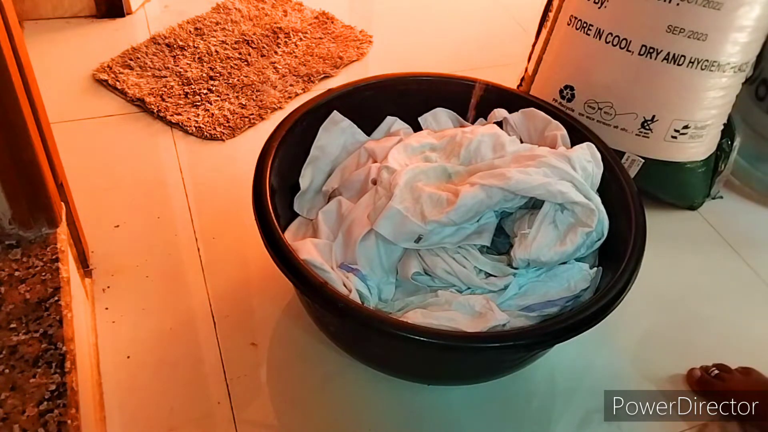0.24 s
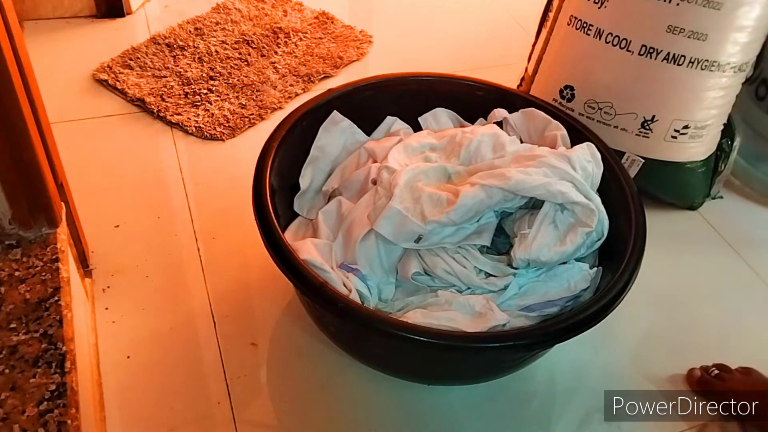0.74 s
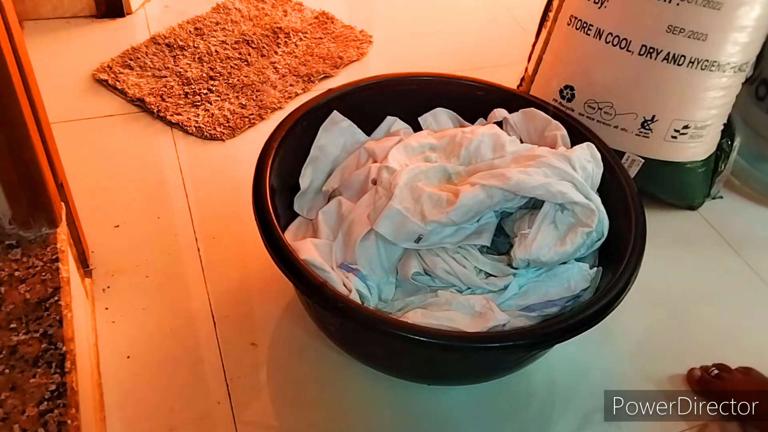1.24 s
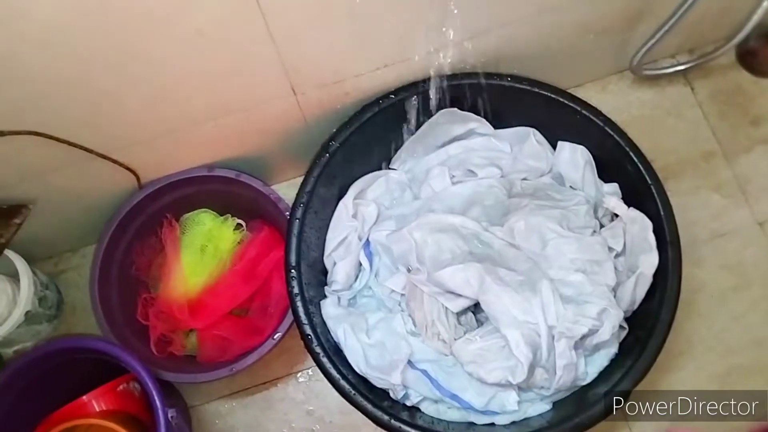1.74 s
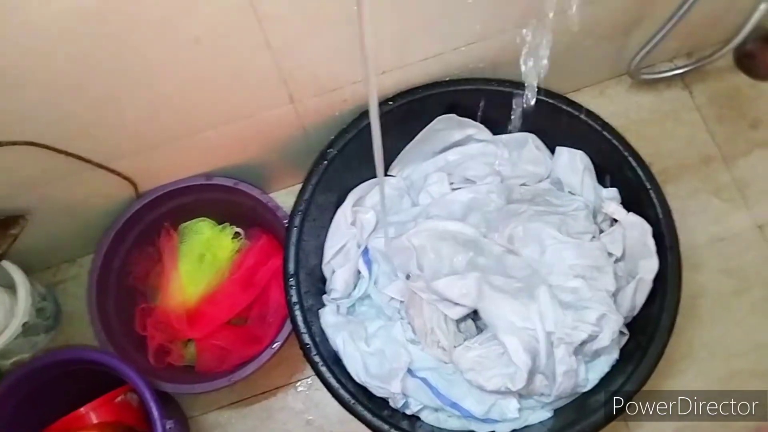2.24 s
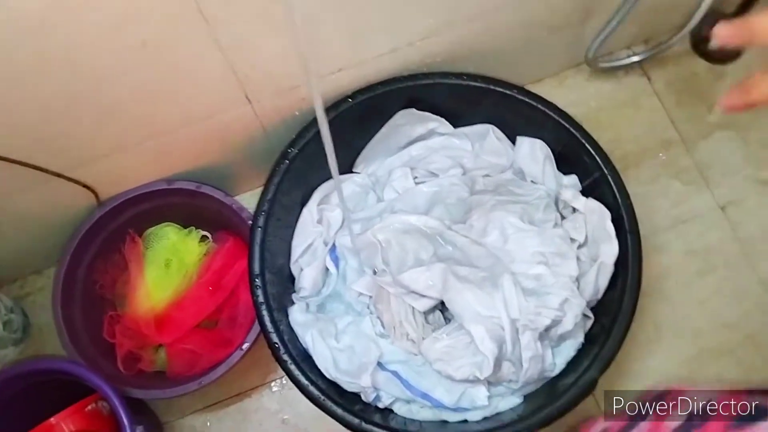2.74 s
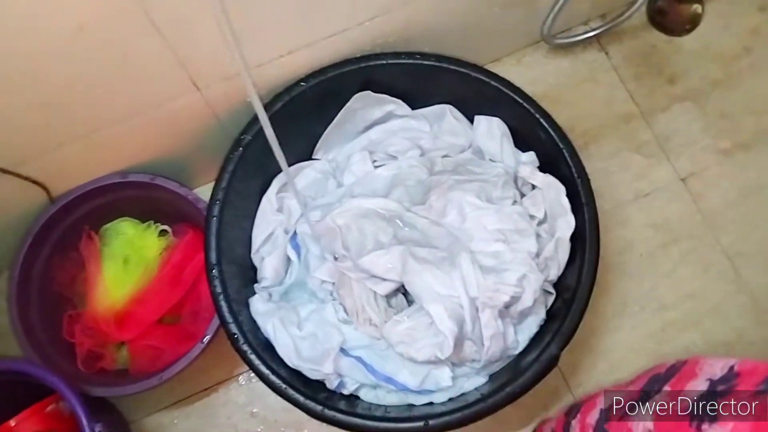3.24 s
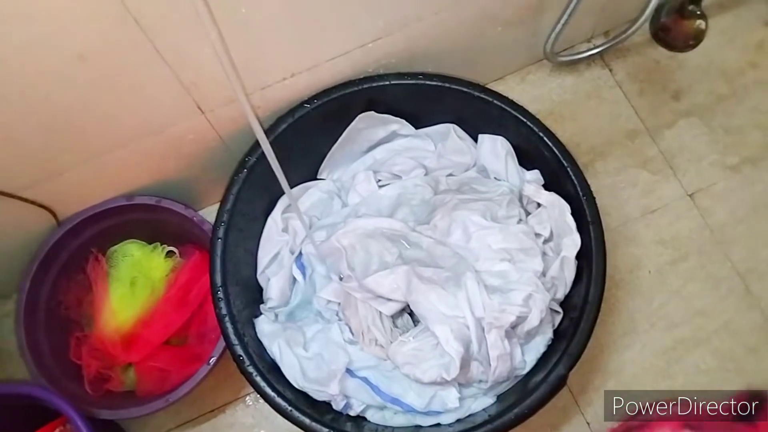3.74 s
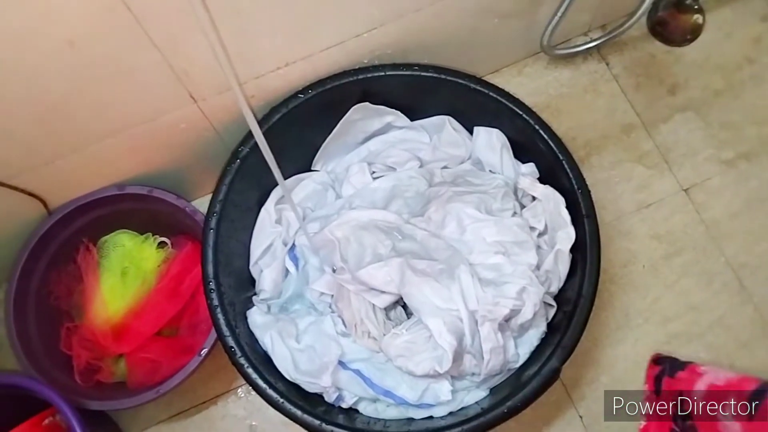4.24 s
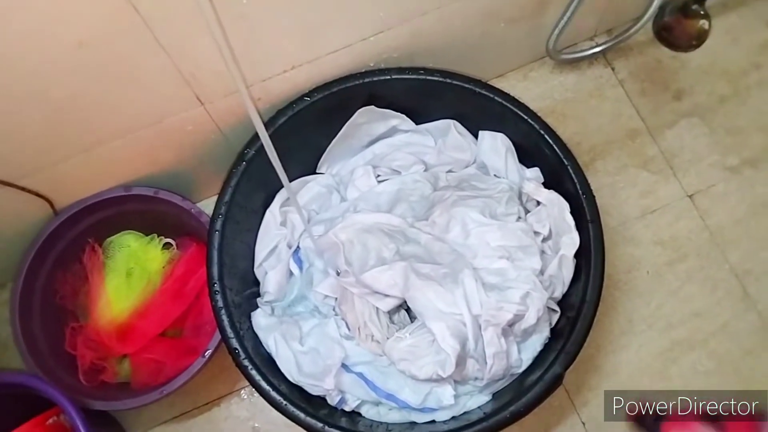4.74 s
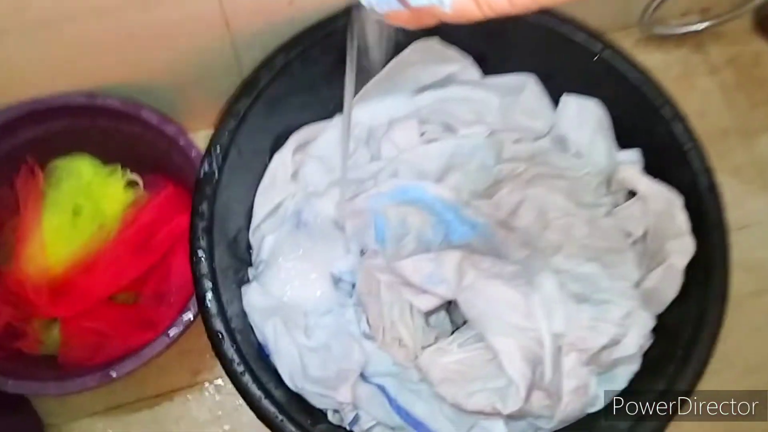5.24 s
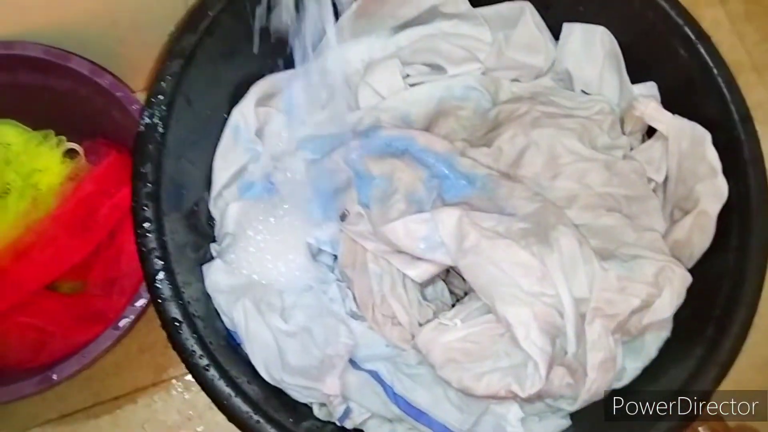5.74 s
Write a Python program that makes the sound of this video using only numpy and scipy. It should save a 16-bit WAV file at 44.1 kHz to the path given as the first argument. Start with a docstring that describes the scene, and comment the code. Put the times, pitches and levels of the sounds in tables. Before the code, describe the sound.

Faint room rumble and isolated drips come first, with one tiny squeak. Then water gushes suddenly into a tub of soaked laundry: crisp droplets, soft slaps, low wall drumming, bubbles and froth. It runs irregularly until just after five seconds, then drops to thinner, patchy spatter over a motor-like hum. Indoors on hard tile, heard closely by a small stereo microphone, brighter on the right.

```python
"""A quiet tiled washroom: low rumble, faint hiss, a far motor's hum, a few ringing drips, a faint squeak.
Then a tap jet falls into a plastic tub of wet clothes: noise snaps make the spatter and wet slaps,
short rising tones make bubbles and gurgles, and ringing filters make the tub wall drum.
Froth surges briefly, and big droplets ring the right one of two small microphone ports near 9 kHz."""
import sys
import numpy as np
from scipy import signal
from scipy.io import wavfile
from scipy.ndimage import uniform_filter1d

SR = 44100
rng = np.random.default_rng(int(sys.argv[2]) if len(sys.argv) > 2 else 0)


def store_pcm(level_fs):
    """Save levels as 16-bit WAV."""
    pcm = np.round(np.clip(level_fs, -1, 1) * 32767).astype(np.int16)
    wavfile.write(sys.argv[1], SR, np.atleast_2d(pcm).T)


N = 264159


def gain_of(db):
    """Turns decibels into amplitude."""
    return 10 ** (np.asarray(db) / 20)


def evened(x):
    """Scales so that the mean of the channels has rms 1."""
    return x / np.sqrt(np.mean(np.atleast_2d(x).mean(0) ** 2) + 1e-20)


def read(points, hz):
    """Reads a spectrum table at the given frequencies."""
    f, value = np.transpose(points)
    return np.interp(np.log(hz + 1), np.log(f + 1), value)


def follow(table, before=-120.):
    """Reads the columns of a time table, sample by sample."""
    s, *columns = np.transpose(table)
    return [np.interp(np.arange(N) / SR, s, c, left=before) for c in columns]


def colour(x, points):
    """Filters with the gains of a spectrum table; nothing sounds before its cause."""
    hz = abs(np.fft.fftfreq(4096, 1 / SR))
    log_gain = np.log(gain_of(read(points, hz)))
    # the phase that goes with these gains in a causal filter
    response = np.exp(np.conj(signal.hilbert(log_gain)))
    taps = np.fft.ifft(response).real[:2048]
    taps = taps.reshape((1,) * (x.ndim - 1) + (-1,))
    return signal.oaconvolve(x, taps, axes=-1)[..., :N]


def closed(points):
    """Adds steep ends to a spectrum table."""
    (low_hz, low_db), (high_hz, high_db) = points[0], points[-1]
    return [(low_hz / 3, low_db - 40)] + points + [(high_hz * 3, high_db - 40)]


# Treble lift of the right port's cavity: f/Hz, level/dB
RIGHT_PORT = [(3500, -1), (5500, 6), (7000, 11.5), (8000, 14.5), (8850, 21), (9500, 17), (10500, 9),
              (12000, 4.5), (15500, 1.5)]


def ports(x):
    """The small cavity of the right microphone port lifts the treble."""
    return np.array([x[0], colour(x[1], RIGHT_PORT)])


def spatter(x, points):
    """Gives water hits their colour, as the two ports hear them."""
    return ports(colour(x, points))


def drift(samples):
    """Makes slow random movement of rms 1."""
    smoothed = uniform_filter1d(rng.standard_normal(N), size=samples)
    return evened(uniform_filter1d(smoothed, size=samples))


# How alike the two sides are: f/Hz, likeness
LIKENESS = [(60, 0.56), (130, 1), (290, 0.89), (640, 0.32), (1410, -0.19), (3100, 0.12), (6820, -1.05),
            (15000, 0.41)]
# How much louder the left side is: f/Hz, level/dB
LEFT_LEAN = [(60, 11.5), (150, 5), (400, 0.5), (800, 1), (2000, -1), (4000, -2.5)]


def wash(points, patchy_db):
    """Makes two-channel noise whose likeness depends on pitch, with drifting loud and soft patches."""
    frames, hz = N // 256 + 5, np.fft.rfftfreq(1024, 1 / SR)
    a, b, c, d, patches = rng.standard_normal((frames, 513, 5)).T
    patches = uniform_filter1d(uniform_filter1d(patches, size=10, axis=0), size=12, axis=1)
    same = np.clip(read(LIKENESS, hz), -1, 1)[:, None]
    left = a + 1j * b
    right = same * left + np.sqrt(1 - same ** 2) * (c + 1j * d)
    z = np.array([left * gain_of(read(LEFT_LEAN, hz))[:, None], right])
    z *= gain_of(read(closed(points), hz)[:, None] + patchy_db * patches / patches.std())
    return signal.istft(z, nperseg=1024, noverlap=768)[1][:, :N]


def sparse(per_s, spread_db, shape):
    """Picks random instants of scattered size: spread above 0, a few stand out; below 0, a few are weaker."""
    sizes = gain_of(spread_db * np.minimum(rng.exponential(1, shape), 5))
    return sizes * (rng.random(shape) < per_s / SR)


def burst(train, decay_s):
    """Each instant starts a dying envelope."""
    return signal.lfilter([1], [1, -np.exp(-1 / (decay_s * SR))], train)


def crackle(per_s, spread_db, snap_s, bed):
    """Noise breaks up into quick snaps over a steady bed."""
    snaps = evened(burst(sparse(per_s, spread_db, N), snap_s))
    return np.hypot(bed, snaps) * rng.standard_normal((2, N))


def tone(hz, db, waver, wobble):
    """A steady tone wavers in strength and wobbles in phase (wobble in turns)."""
    turns = hz * np.arange(N) / SR + rng.random() + wobble * drift(samples=2500)
    strength = gain_of(db) * (1 + waver * drift(samples=2000))
    return np.sqrt(2) * strength * np.sin(2 * np.pi * turns)


def bubble(hz, cycles, rise):
    """A small air bubble starts softly, rings briefly and, if rise is above 0, climbs in pitch."""
    u = np.arange(round(4 * cycles / hz * SR)) / SR * hz / cycles
    envelope = (1 - np.exp(-9 * u)) ** 2 * np.exp(-1.5 * u)
    return envelope * np.sin(2 * np.pi * cycles * u * (1 + rise * u))


def place_rings(table, rise):
    """Places short rings at listed moments; the right port hears each one 9 samples later."""
    out = np.zeros((2, N + SR))
    for s, level_db, hz, cycles in table:
        ring = gain_of(level_db) * bubble(hz, cycles, rise)
        at = round(s * SR)
        out[0, at:at + len(ring)] += ring
        out[1, at + 9:at + 9 + len(ring)] += ring
    return out[:, :N]


# Room air: t/s, rumble level/dB, hiss level/dB
AIR = [(0, -43.5, -49.5), (0.35, -43, -51), (0.43, -40.5, -47), (0.6, -43.5, -51), (1.44, -45.5, -52),
       (2., -44, -49), (3.5, -44.5, -49.5), (5.15, -44.5, -58), (5.25, -65, -45), (5.99, -40.5, -51.5)]
# Deepest rumble: t/s, level/dB
DEEP = [(0, -65), (1.5, -67), (3, -64), (3.8, -61), (4.6, -68), (5.2, -70), (5.99, -57)]
# Tone colour of rumble, hiss and deepest rumble: f/Hz, relative level/dB per Hz
RUMBLE_COLOUR = [(12, -50), (20, -21), (71, -47), (113, -13), (229, 4), (260, 3), (285, 1), (439, -0.5),
                 (472, 0.5), (597, 3), (642, -1), (938, -2.5), (1150, -7), (1350, -18), (1500, -36),
                 (1950, -83), (3300, -120)]
HISS_COLOUR = [(900, -3.5), (1300, -7), (2000, -12), (3200, -13.5), (4500, -20.5), (8000, -29),
               (12000, -30.5), (15500, -26)]
DEEP_COLOUR = [(20, -6), (45, -7), (70, 4), (100, 2), (130, -25.)]


def air():
    """The room's air is coloured noise: low rumble, faint hiss and a deeper rumble below."""
    rumble_db, hiss_db = follow(AIR)
    rumble = evened(wash(RUMBLE_COLOUR, patchy_db=.5))
    hiss = evened(ports(wash(HISS_COLOUR, patchy_db=.5)))
    deep = evened(wash(DEEP_COLOUR, patchy_db=.5))
    return gain_of(rumble_db) * rumble + gain_of(hiss_db) * hiss + gain_of(follow(DEEP)[0]) * deep


HUM_HZ = 261.8  # the motor's second order
# Far motor: t/s, second order level/dB, other orders level/dB
HUM = [(0, -67, -71), (1.43, -56.5, -59), (1.47, -47, -53), (2.6, -46, -51), (3.1, -51.5, -52.5),
       (3.9, -49.5, -50.5), (4.5, -52.5, -53.5), (4.7, -47.5, -61), (4.95, -52, -58), (5.17, -49, -58),
       (5.21, -41, -65), (5.5, -39, -63), (5.62, -46, -68), (5.99, -44, -62)]
# The other orders: multiple of the second order's pitch, level/dB added to their shared level
HUM_ORDERS = [(.5, -5.), (1.5, -7.), (2, -2.), (4, -13.)]
# How freely the second order wavers: t/s, strength depth 0-1, phase wobble/turns
LOOSE = [(0, .45, .14), (5.15, .45, .14), (5.21, .08, .04), (5.99, .08, .04)]


def hum():
    """A far motor hums at several multiples of one pitch, each wavering alone."""
    second_db, others_db = follow(HUM)
    waver, wobble = follow(LOOSE, before=0)
    others = sum(tone(k * HUM_HZ, db + others_db, .5, .16) for k, db in HUM_ORDERS)
    return tone(HUM_HZ, second_db, waver, wobble) + others


DRONE_HZ = 114.5
# Lower drone: t/s, level/dB
DRONE = [(0, -57.5), (1.43, -57), (1.47, -64), (3.7, -66), (5.15, -71), (5.25, -60.5), (5.99, -52.5)]


def drone():
    """A single wavering tone drones below the motor's hum."""
    return tone(DRONE_HZ, follow(DRONE)[0], waver=0.5, wobble=0.18)


DRIP_LEAN_DB = -3  # left side against right
TOP_HZ = 10500  # where the top treble begins
# Single drips: t/s, hit level/dB, tail level under the hit/dB, top treble level/dB
DRIPS = [(.006, -40.5, -4, 0.1), (0.0334, -26, -24, 7), (.046, -39, -20, 3), (.125, -38, -18, -3),
         (.1685, -39, -26, -3), (0.3503, -25.5, -21.5, -5), (0.38, -42, -22, -1), (1.078, -39, -16, -4),
         (1.172, -39.5, -12, -10)]
# Tone colour of a drip: f/Hz, relative level/dB per Hz
DRIP_COLOUR = [(300, -50.), (3000, -13), (6000, -17.5), (9000, -15), (12000, -7), (15500, -5.5)]


def drips(tail_s=0.04):
    """A lone drip makes one sharp snap, then the tiles ring on as fading noise."""
    s, hit_db, tail_db, top_db = np.transpose(DRIPS)
    hits, tails, one = np.zeros((3, 2, N))
    at = np.round(s * SR).astype(int)
    hits[:, at] = gain_of(hit_db) * gain_of([[DRIP_LEAN_DB], [0]])
    tails[:, at] = hits[:, at] * gain_of(tail_db)
    # scale by the response to a single click
    one[:, 0] = 1
    unit = abs(spatter(one, DRIP_COLOUR)[1]).max() / 2
    snaps = burst(hits, 0.00015) + burst(tails, tail_s)
    out = spatter(hits + snaps * rng.standard_normal((2, N)), DRIP_COLOUR) / unit
    high_pass = signal.firwin(101, TOP_HZ, pass_zero=False, fs=SR)
    top = signal.oaconvolve(out, high_pass[None], "same")
    # each drip's treble setting holds until just before the next drip
    latest = np.maximum(np.searchsorted(at - 100, np.arange(N)) - 1, 0)
    return out + (gain_of(top_db)[latest] - 1) * top


SQUEAK_S, SQUEAK_LENGTH_S = 0.385, 0.065  # full for half this length, then fades over one length
# Tones in the squeak: f/Hz, level/dB
SQUEAK_PARTIALS = [(960, -56), (1190, -57), (1385, -59), (1770, -61), (2070, -67), (2295, -59), (3220, -69)]


def squeak():
    """A faint cluster of wavering tones starts quickly and fades."""
    age = np.arange(N) / SR - SQUEAK_S
    shape = np.clip(age / 0.0043, 0, 1) * np.clip(1.5 - age / SQUEAK_LENGTH_S, 0, 1)
    return shape * sum(tone(hz, db, waver=.3, wobble=.7) for hz, db in SQUEAK_PARTIALS)


TICK_CYCLES = 3
# Droplets on wet cloth: t/s, level/dB, f/Hz
TICKS = [(1.062, -44, 2500), (1.4795, -19, 1310), (1.4575, -20, 2780), (1.5267, -16, 5900),
         (1.56, -18, 5000), (1.5875, -19, 5600), (1.627, -19, 6000), (1.6883, -23, 3600),
         (1.7118, -13, 6310), (1.9722, -20, 6080), (2.056, -22, 4150), (2.059, -10, 6000),
         (2.1233, -25, 5280), (2.246, -17, 6470), (2.6122, -14, 6430), (3.143, -20, 4520),
         (3.8694, -20, 6030), (4.044, -15, 5970), (4.3987, -8, 6250), (4.7658, -9, 4460),
         (5.182, -13, 2020), (5.2267, -21, 1390), (5.303, -23, 1400), (5.415, -26, 1500),
         (5.4801, -25, 2930), (5.5146, -20, 6400), (5.55, -22, 2000), (5.5636, -16, 5600),
         (5.5959, -11, 6430), (5.6148, -28, 3000), (5.6683, -16, 5810), (5.7116, -29, 2690)]


def ticks():
    """Droplets tick on wet cloth: very short rings of fixed pitch."""
    return place_rings([(*row, TICK_CYCLES) for row in TICKS], rise=0)


# strong gushes lean to the right, weak flow to the left
USUAL_DB, LEAN_DB, LEAN_PER_DB = -23.5, 1.5, -0.54
RIGHTWARD_S, RIGHTWARD_LEAN_DB = 5.18, -4.5  # from this time the spatter sits further right
# Strength of the falling water: t/s, droplet spatter level/dB, bubble fizz level/dB
FLOW = [(1.4512, -42, -50), (1.454, -27, -45), (1.46, -21, -40), (1.482, -22.5, -39), (1.526, -25, -45),
        (1.579, -23, -41), (1.623, -23.5, -50), (1.651, -24, -51), (1.691, -28.5, -44.5),
        (1.705, -25.5, -38), (1.721, -23.5, -44), (1.749, -27.5, -43), (1.785, -26, -40.5),
        (1.819, -32, -50), (1.835, -29.5, -62), (1.905, -25, -56), (1.955, -28, -53), (1.99, -22.5, -48),
        (2.038, -29.5, -56), (2.064, -23, -40), (2.114, -32, -50), (2.134, -27, -49), (2.184, -30, -42),
        (2.21, -24, -39), (2.24, -23, -39), (2.258, -29, -41), (2.328, -26.5, -61), (2.352, -21, -49),
        (2.362, -27, -39), (2.416, -28, -39), (2.449, -26.5, -37), (2.463, -20, -39), (2.501, -21, -37),
        (2.587, -22.5, -37.5), (2.621, -20.5, -49), (2.675, -18.5, -42), (2.721, -22.5, -35),
        (2.803, -23.5, -37.5), (2.839, -19.5, -36), (2.924, -22, -39), (2.948, -22.5, -38),
        (3.002, -22.5, -36), (3.02, -22, -36), (3.046, -30, -40), (3.104, -28.5, -41), (3.128, -29, -38),
        (3.148, -22, -37.5), (3.208, -20.5, -33), (3.294, -23.5, -41), (3.321, -22, -38),
        (3.359, -22.5, -38.5), (3.393, -22, -36), (3.451, -21.5, -41.5), (3.473, -23.5, -39),
        (3.511, -24.5, -35), (3.553, -26, -34.5), (3.601, -23, -39), (3.677, -21, -33), (3.748, -21.5, -35),
        (3.79, -21, -36), (3.81, -22, -35.5), (3.888, -23, -37.5), (3.938, -21.5, -44.5),
        (3.998, -23, -33.5), (4.084, -26.5, -46), (4.154, -24, -37), (4.189, -26, -42), (4.235, -28, -39),
        (4.259, -23.5, -36), (4.293, -21.5, -31.5), (4.335, -26, -38), (4.387, -25.5, -39.5),
        (4.437, -25.5, -41.5), (4.459, -24, -46), (4.509, -25, -35.5), (4.585, -27.5, -36),
        (4.634, -29, -40.5), (4.678, -22.5, -38), (4.702, -25, -40), (4.714, -21.5, -33),
        (4.778, -22.5, -32), (4.818, -20, -30.5), (4.858, -21.5, -30), (4.902, -22, -34.5),
        (4.95, -23.5, -33.5), (5.006, -25.5, -34.5), (5.052, -27, -38.5), (5.107, -23, -34.5),
        (5.161, -20, -37), (5.177, -29, -40), (5.187, -32.5, -49), (5.207, -27, -51), (5.379, -29, -41),
        (5.417, -27, -47), (5.457, -29, -54), (5.487, -25, -42), (5.522, -27.5, -51), (5.576, -22.5, -60),
        (5.596, -26.5, -57), (5.656, -31.5, -42), (5.678, -28.5, -50), (5.74, -33, -56), (5.762, -30, -65),
        (5.828, -30, -56), (5.884, -25.5, -40), (5.987, -30.5, -52)]
# Extra coarse droplets in the spatter: t/s, level/dB
COARSE = [(1.45, 5.5), (1.9, 0), (2.1, 2), (2.3, 0), (2.5, 5), (3.3, 3.5), (3.85, 1), (4.1, 4.5), (5.15, 4),
          (5.3, 2), (5.55, 7), (5.575, 11), (5.605, 16), (5.62, 7), (5.99, -2)]
# Three droplet sizes, coarse to fine, in overlapping bands: f/Hz, level/dB
SIZES = [
    [(5500, 0.), (9000, -15.)],
    [(5000, -15.), (7500, 0.), (10500, 0.), (14000, -12.)],
    [(9000, -15.), (12500, 0.)],
]
# Tone colour of the spatter: f/Hz, relative level/dB per Hz
SPRAY_COLOUR = [(1500, -14.5), (3000, -16.5), (5000, -7), (7000, -4.5), (9000, -3.5), (11000, -1),
                (13500, 1.5), (15500, 3)]


def spray(per_s=300, spread_db=-0.5, snap_s=0.0021, own_db=-3.0, mist_db=0.5, patchy_db=0.92):
    """Droplets snap near both ports or near one, as noise bursts over a mist of fine ones."""
    level_db = follow(FLOW)[0]
    lean_db = LEAN_DB + LEAN_PER_DB * (level_db - USUAL_DB)
    lean_db += RIGHTWARD_LEAN_DB * (np.arange(N) > RIGHTWARD_S * SR)
    out = np.zeros((2, N))
    for band, share_db in zip(SIZES, (follow(COARSE, before=0)[0], 0, 0)):
        both = burst(sparse(per_s, spread_db, N), snap_s)
        near = burst(sparse(per_s, spread_db, (2, N)), snap_s)
        snaps = np.hypot(both, gain_of(own_db) * near)
        envelope = np.hypot(snaps / np.sqrt(np.mean(snaps ** 2)), gain_of(mist_db))
        swing_db = share_db + patchy_db * drift(samples=700)  # each size comes and goes alone
        out += gain_of(swing_db) * colour(envelope * rng.standard_normal((2, N)), band)
    out = evened(spatter(out, [(300, -44.0)] + SPRAY_COLOUR))
    left_gain = gain_of(np.clip(lean_db, -12, 12))
    return out * gain_of(level_db) * np.array([left_gain, np.ones(N)])


# Tone colour of the bubbles: f/Hz, relative level/dB
FIZZ_COLOUR = [(1800, -9), (2500, -13), (2900, 5.5), (3500, 3), (4100, 6.5), (4600, 2), (5100, -9),
               (6500, -14)]


def fizz(per_s=60, spread_db=1.0, cycles=13.0, rise=0.0046, froth_db=3.3, swarm_db=3.5):
    """Swarms of bubbles of sixteen sizes ring over froth that bursts in clumps."""
    swarms = np.zeros((2, N))
    for hz in np.geomspace(1800, 6500, num=16):
        # each size swarms alone
        train = sparse(per_s, spread_db, N) * gain_of(swarm_db * drift(samples=900))
        late = rng.integers(-25, 25)  # path difference to the two ports, samples
        ring = signal.oaconvolve(train, bubble(hz, cycles, rise))[:N]
        ring *= gain_of(read(FIZZ_COLOUR, hz))
        swarms += [ring, np.roll(ring, late)]
    clumps = crackle(per_s=180, spread_db=-3.5, snap_s=.004, bed=.8)
    froth = colour(clumps, closed(FIZZ_COLOUR))
    mixed = evened(ports(evened(swarms) + gain_of(froth_db) * evened(froth)))
    return gain_of(follow(FLOW)[1]) * mixed


# Where the jet lands: t/s, slap on wet cloth level/dB, tub drumming level/dB
LANDING = [(1.455, -38, -37.5), (1.58, -47.5, -41), (1.67, -47.5, -40), (1.73, -47, -34.5),
           (1.78, -46.5, -40.5), (1.95, -45.5, -39.5), (2.2, -46.5, -40.5), (2.3, -44.5, -44.5),
           (3.0, -58, -42), (4.1, -50, -48.5), (4.7, -56, -43.5), (5.15, -46.5, -42), (5.22, -40.5, -38),
           (5.4, -42, -41.5), (5.62, -50.5, -47.5), (5.99, -43, -45)]
# Tone colour of the slap: f/Hz, relative level/dB per Hz
SLAP_COLOUR = [(600, -26), (1000, -3.5), (1400, -1), (1900, -1), (2400, 0), (3200, 0)]


def slap(swing_db=1.5):
    """The jet slaps wet cloth: noise with many quick snaps that comes and goes at random."""
    snaps = evened(burst(sparse(per_s=260, spread_db=2.5, shape=N), .0015))
    cloth = wash(SLAP_COLOUR, patchy_db=1.5)
    swinging = cloth * np.hypot(.9, snaps) * gain_of(swing_db * drift(samples=2500))
    return gain_of(follow(LANDING)[0]) * evened(swinging)


# Pitches at which the tub wall rings: f/Hz, width/Hz, relative level/dB
TUB_MODES = [(204, 27, -3), (351, 15, -0.5), (395, 25, 1), (503, 42, 2.8), (607, 14, -2.5)]


def tub_modes():
    """The stream shakes the plastic wall, which rings at its own pitches."""
    out = np.zeros(N)
    for hz, width_hz, db in TUB_MODES:
        r = np.exp(-np.pi * width_hz / SR)
        feedback = [1, -2 * r * np.cos(2 * np.pi * hz / SR), r * r]
        out += gain_of(db) * evened(signal.lfilter([1], feedback, rng.standard_normal(N)))
    return evened(out)


# Tone colour of the drumming: f/Hz, relative level/dB per Hz
TUB_COLOUR = [(45, -48), (80, -18), (130, -32), (205, -1), (295, -6), (352, -1.5), (415, -1.5), (445, -7),
              (500, 6.5), (570, -17), (610, -2.5), (700, -7), (1100, -18.5), (1500, -36)]


def tub(modes_db=-3, swing_db=1.):
    """The tub drums: low noise and the ringing wall come and go at random."""
    wall = evened(wash(TUB_COLOUR, patchy_db=0.5)) + gain_of(modes_db) * tub_modes()
    swinging = evened(wall * gain_of(swing_db * drift(samples=2500)))
    return gain_of(follow(LANDING)[1]) * swinging


def lesser_drops(per_s=120, over_spatter_db=2.5, spread_db=2, snap_db=-18):
    """Makes more drops at random moments, their strength following the spatter around them."""
    at = np.flatnonzero(rng.random(N) < per_s / SR)
    ring_db = (follow(FLOW)[0] + over_spatter_db + spread_db * rng.standard_normal(N))[at]
    return list(zip(at / SR, ring_db, ring_db + snap_db))


RING_HZ, RING_SCATTER, RING_CYCLES = 8960, 0.034, 11.5  # scatter is a share of the pitch
SPLASH_DB = -21.5  # against the ring
# The biggest droplets: t/s, ring level at the right port/dB, treble snap level/dB
DROPS = [(1.4566, -8, -23), (1.4634, -12, -18), (1.4798, -10, -16), (1.4877, -2, -20), (1.5284, -1.5, -29),
         (1.5691, -7, -30), (1.5856, 0, -19), (1.6271, -8, -18), (1.6767, -13, -36), (1.7137, -13, -26),
         (1.7267, -5.5, -25), (1.7643, -14, -16), (1.8287, -5, -25), (1.973, 0.5, -25), (1.9831, -7, -20),
         (2.0013, -14, -34), (2.0572, -2, -24), (2.0646, -4, -36), (2.069, -14, -34), (2.1253, -0.5, -28),
         (2.2038, -9, -17), (2.2167, -9, -30), (2.229, -7, -21), (2.2483, -2, -20), (2.345, -7, -20),
         (2.359, -13, -21), (2.467, -15, -25), (2.4732, -10, -31), (2.507, -6, -29), (2.5433, -4.5, -19),
         (2.5725, -14, -31), (2.588, -7, -20), (2.6125, -4, -15), (2.638, -10, -28), (2.6448, -15, -30),
         (2.6533, -9, -18), (2.666, -5, -29), (2.6723, -7, -19), (2.6777, -16, -19), (2.6918, -11, -21),
         (2.7062, -11, -27), (2.8346, 1, -20), (2.8419, -16, -29), (2.854, -9, -29), (2.8601, -6, -19),
         (2.8739, -16, -17), (2.878, -5, -20), (2.8895, -4, -18), (2.9037, -6, -18), (2.9643, -7, -22),
         (2.9764, -10, -17), (3.0016, -4.5, -23), (3.026, -10, -32), (3.0426, -12, -14), (3.116, -11, -26),
         (3.1437, -6, -18), (3.1706, -5, -32), (3.1976, -3.5, -13), (3.2279, -11, -11), (3.2634, -8, -21),
         (3.2868, -10, -29), (3.3154, -8, -31), (3.3288, -9, -15), (3.3383, -21, -18), (3.3449, -9, -30),
         (3.3683, -3, -21), (3.3818, -10, -13), (3.4413, -1, -22), (3.4579, -7, -20), (3.5037, -2, -31),
         (3.516, -4, -13), (3.6036, -5, -29), (3.6292, -9, -13), (3.669, -4, -28), (3.687, -3, -21),
         (3.6981, -6, -28), (3.7176, -1, -19), (3.7335, -13, -29), (3.7418, -6, -30), (3.7592, -5, -15),
         (3.7805, -2, -12), (3.7863, -6, -16), (3.7965, -2, -27), (3.808, -18, -10), (3.824, -4, -20),
         (3.8309, -3, -19), (3.84, -6, -18), (3.8706, -2, -18), (3.9157, -8, -29), (3.9282, 0, -30),
         (3.937, -2, -31), (3.9681, -5, -32), (3.9944, -11, -18), (4.0118, -2, -32), (4.0174, 0.5, -20),
         (4.044, -6, -34), (4.134, -5, -32), (4.1421, -5, -20), (4.25, -1.5, -24), (4.285, -5, -22),
         (4.3337, -11, -32), (4.3505, -10, -17), (4.3624, -8, -18), (4.4002, -4.5, -22), (4.4507, 2, -32),
         (4.4845, -5.5, -17), (4.523, -4, -17), (4.5418, -5, -28), (4.5644, -15, -10), (4.591, -23, -12),
         (4.6358, -15, -24), (4.6499, -11, -31), (4.6614, -1, -32), (4.668, -7, -16), (4.6827, -4, -22),
         (4.7021, -1, -20), (4.714, -6, -12), (4.791, -4, -31), (4.799, -4, -19), (4.813, -6, -20),
         (4.8468, -4, -20), (4.8527, -10, -17), (4.861, -9, -18), (4.8804, -13, -28), (4.9583, -2.5, -33),
         (4.9668, -9, -24), (4.978, -2, -17), (5.0146, -10, -24), (5.111, -4, -30), (5.1693, -12, -25),
         (5.2039, -10, -34), (5.2593, -12, -37), (5.3416, -11, -35), (5.414, -8, -26), (5.5223, -13, -28),
         (5.5418, -8, -37), (5.5656, -8, -24), (5.5889, -11, -24), (5.5962, -8, -34), (5.6032, -6, -36),
         (5.6363, -9, -35), (5.67, -16, -16), (5.6859, -11.5, -28), (5.7542, -11, -38), (5.9131, -12, -19)]
# Tone colour of the snap: f/Hz, relative level/dB per Hz
SNAP_COLOUR = [(300, -50.), (3000, -41), (6000, -30), (9000, -27), (12000, -5), (15500, -13)]


def drops(snap_s=0.0018, tail_s=0.0017):
    """A droplet sets the right port ringing, snaps in the treble and leaves a short splash."""
    rings, snaps, tails = np.zeros(N + SR), np.zeros(N), np.zeros(N)
    rows = list(DROPS) + lesser_drops()
    pitches_hz = RING_HZ * (1 + RING_SCATTER * rng.standard_normal(len(rows)))
    for hz, (s, ring_db, snap_db) in zip(pitches_hz, rows):
        ring = bubble(hz, RING_CYCLES, 0)
        at = max(round(s * SR) - 14, 0)  # early, to leave room for the soft start
        rings[at:at + len(ring)] += gain_of(ring_db) * ring / ring.max()
        snaps[at] = gain_of(snap_db)
        tails[at] = gain_of(ring_db + SPLASH_DB)
    snap = colour(rng.standard_normal((2, N)), SNAP_COLOUR)
    splash = spatter(rng.standard_normal((2, N)), [(300, -79.0)] + SPRAY_COLOUR)
    envelopes = [burst(snaps, snap_s), burst(tails, tail_s)]
    snaps, tails = uniform_filter1d(envelopes, size=24, origin=11)  # soft start
    out = snaps * snap / snap.std() + tails * evened(splash)
    out[1] += rings[:N]
    return out


SURGE_T60_S = 0.33  # time to fall by 60 dB
# Surges of the jet into deeper water: t/s, starting level/dB
SURGES = [(1.4561, -35), (1.4774, -55), (3.177, -37), (3.196, -50), (3.402, -38), (3.529, -39),
          (4.5096, -39.5), (4.683, -32), (4.828, -29), (4.9334, -32.5), (5.179, -49)]
# Tone colour of a surge: f/Hz, relative level/dB per Hz
SURGE_COLOUR = [(700, -19), (1300, -14), (1900, 1), (2600, 6.5), (3400, 1.5), (5000, -50)]


def surges():
    """Each surge is a quick, dying rush of deeper-voiced froth."""
    t, envelope = np.arange(N) / SR, np.zeros(N)
    for s, start_db in SURGES:
        age = np.maximum(t - s, 0)
        envelope += gain_of(start_db - 60 * age / SURGE_T60_S) * (1 - np.exp(-age / 0.00028))
    froth = crackle(per_s=95, spread_db=4.5, snap_s=0.0036, bed=1.0)
    return envelope * evened(colour(froth, SURGE_COLOUR))


# Low gurgles in the tub: t/s, level/dB, starting f/Hz, cycles (more ring longer)
GURGLES = [(1.46, -31, 215, 15), (1.479, -27, 458, 6.4), (1.637, -24, 477, 4.5), (1.712, -23.5, 350, 8.9),
           (1.739, -47, 530, 7.5), (1.876, -26, 510, 6), (1.945, -29, 370, 4), (2.012, -27, 300, 3.7),
           (1.979, -31, 596, 6.2), (2.049, -33, 510, 9.5), (2.18, -29, 430, 9.1), (2.35, -27, 229, 3),
           (2.509, -29, 513, 14), (4.796, -22.5, 510, 4.3), (5.14, -35, 513, 11), (5.195, -29.5, 437, 44),
           (5.205, -32, 344, 28), (5.39, -36, 384, 23), (5.565, -31.5, 510, 12)]


def gurgles():
    """Low bubbles gurgle in the tub, rising slightly in pitch."""
    return place_rings(GURGLES, rise=0.0079)


PLOP_CYCLES = 4
# Plops of larger bubbles: t/s, level/dB, starting f/Hz
PLOPS = [(1.479, -19, 3840), (1.7226, -10.5, 3100), (2.2019, -18, 4100), (2.304, -16, 1760),
         (2.504, -12, 4200), (2.9628, -12, 4000), (3.1771, -5.5, 2070), (3.1962, -19, 4230),
         (3.528, -10, 3040), (3.9935, -16, 4100), (4.0436, -15, 4230), (4.259, -11, 3200),
         (4.6883, -16, 3110), (4.834, -9, 2160), (4.8474, -13, 4120), (4.9362, -9, 3320),
         (5.1835, -21.5, 1260), (5.2447, -13, 3370), (5.3585, -17, 3500), (5.755, -22, 1550)]


def plops():
    """Single larger bubbles stand out of the fizz, rising slightly in pitch."""
    return place_rings([(*row, PLOP_CYCLES) for row in PLOPS], rise=0.0062)


def scene():
    """Adds room, motor, drips and falling water together."""
    room = air() + hum() + drone() + drips() + squeak()
    jet = spray() + fizz() + slap() + tub() + surges()
    return room + jet + drops() + ticks() + gurgles() + plops()


EDGE_HZ = 15620


def record(dry):
    """The converter clips the loudest peaks; then the highest treble is cut off."""
    edge = signal.firwin(401, EDGE_HZ, window=("kaiser", 8), fs=SR)
    return signal.oaconvolve(np.clip(dry, -.82, .82), edge[None], "same")


dry = scene()
out = record(dry)
store_pcm(out)
```